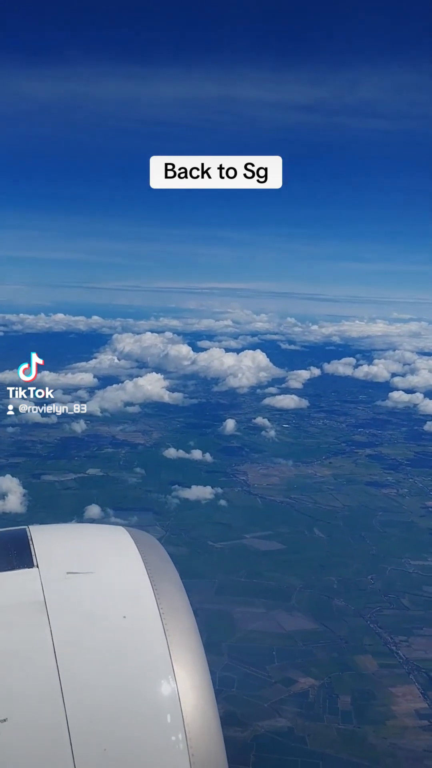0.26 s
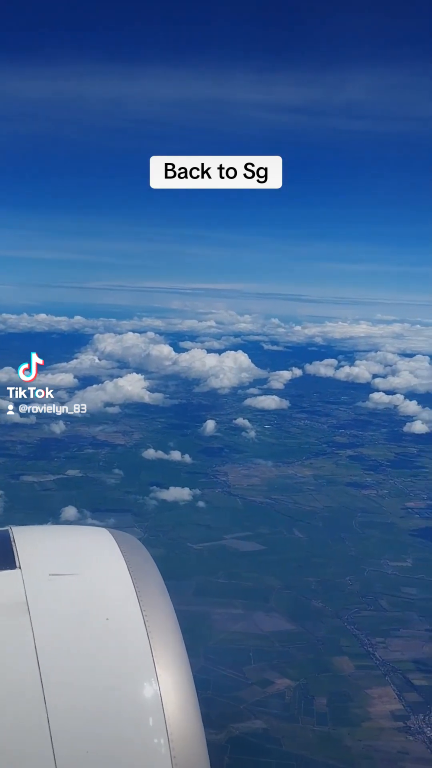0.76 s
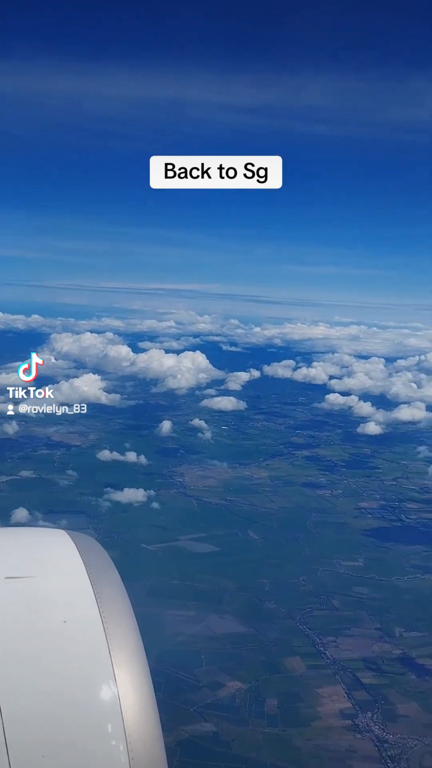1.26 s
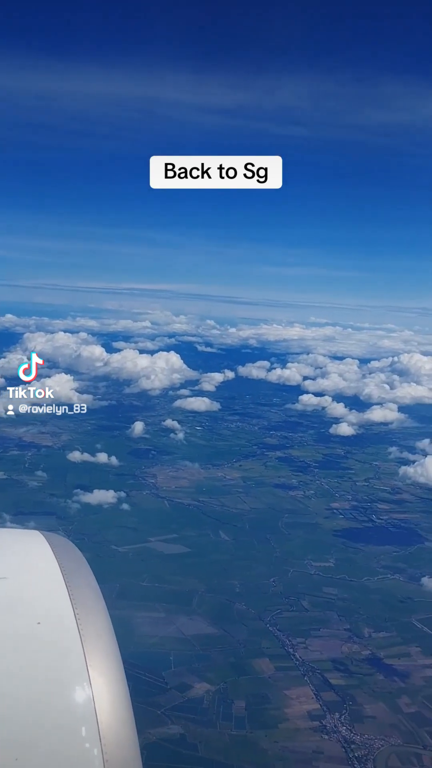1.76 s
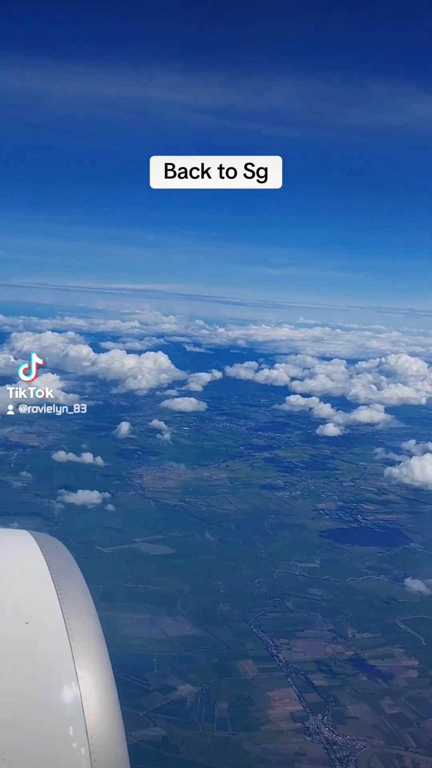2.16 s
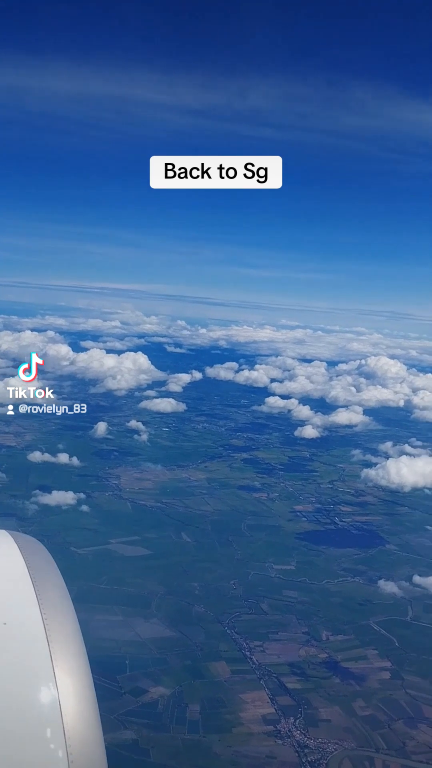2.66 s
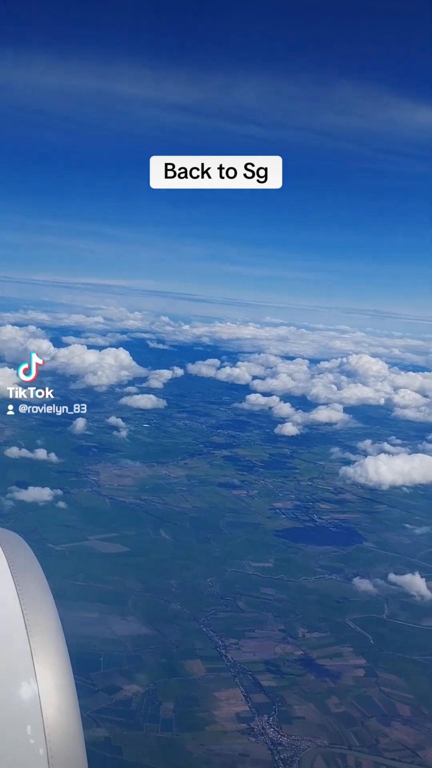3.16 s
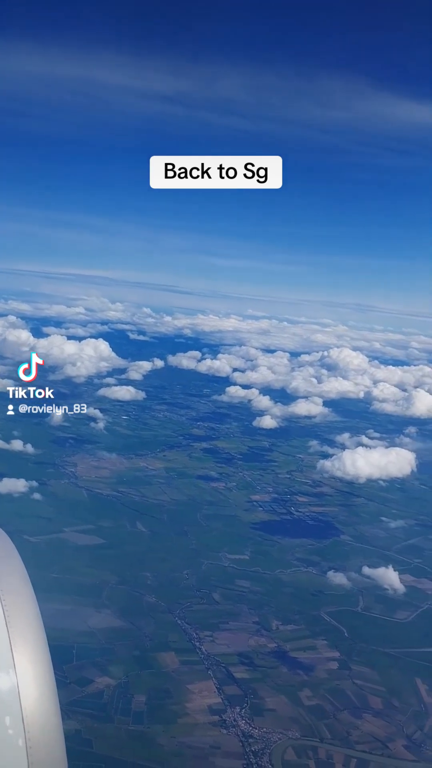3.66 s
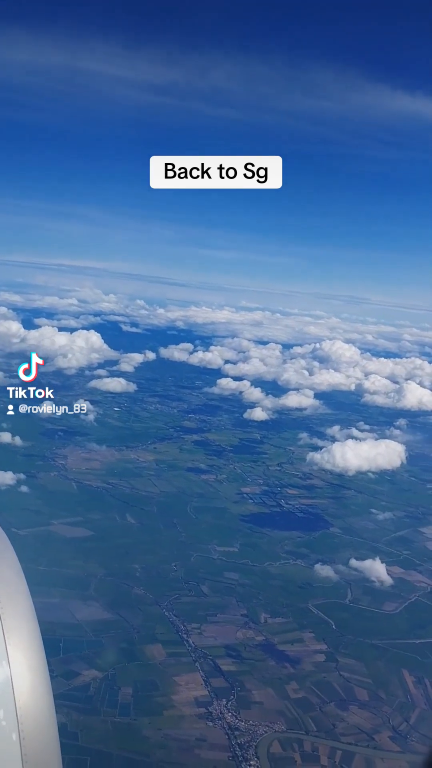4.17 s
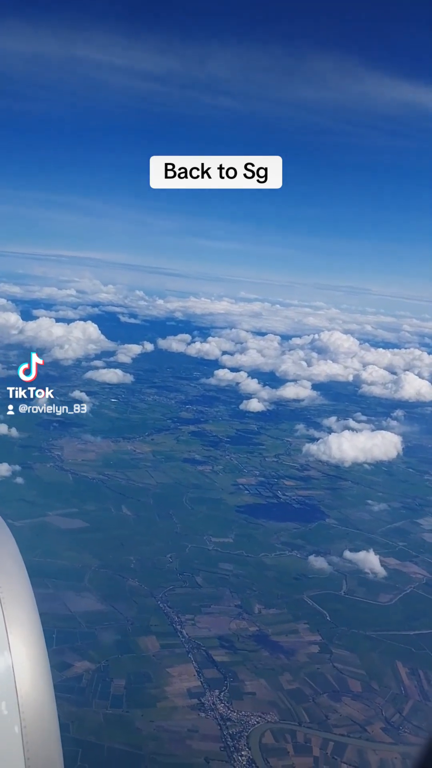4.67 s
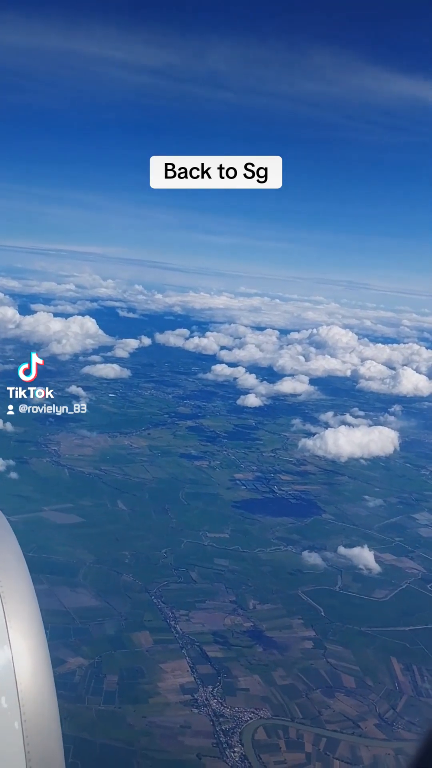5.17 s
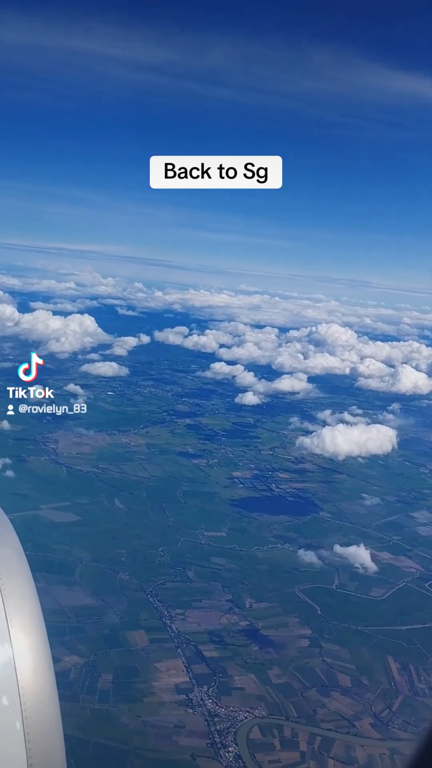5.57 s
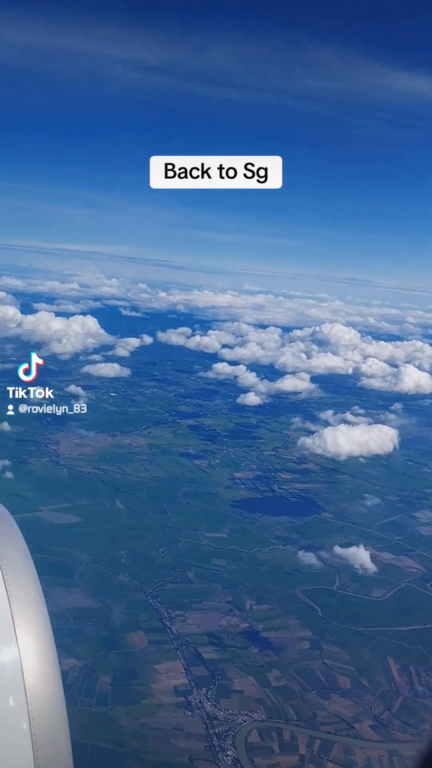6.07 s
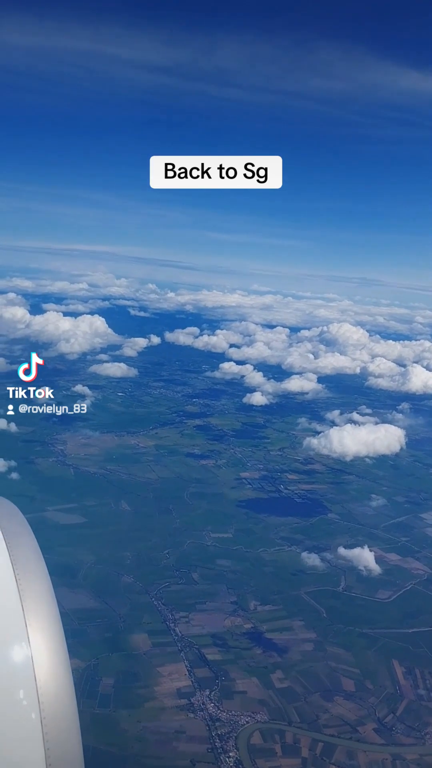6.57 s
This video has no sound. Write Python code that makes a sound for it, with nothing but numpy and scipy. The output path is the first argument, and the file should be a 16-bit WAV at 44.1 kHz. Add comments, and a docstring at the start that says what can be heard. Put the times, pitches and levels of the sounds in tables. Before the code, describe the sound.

Close cabin perspective beside a jet engine: dark, bass-heavy mono noise, gently fluttering, with a low pulsing hum, wavering shaft tones and a faint mid-pitched fan whine. It is almost constant, except for slow rumble shifts and very faint panel ticks in the second half. A sharp click cuts it off; after a tiny gap, stuttering clicks introduce rougher, airier stereo wind noise that rises to an abrupt end.

```python
"""Airliner cabin by the engine

A window seat in cruise: turbulent air on the skin is coloured noise, roaring through wall and cabin.
The fan shaft's throbbing drone, faster shafts and whining fans are wandering sines; slipping trim ticks as
struck modes. The mono bed breaks off with a click into a near-silent gap, then returns with more clicks
as a brighter, wider roar of stereo noise from another part of the flight, swelling to the end."""
import sys
import numpy as np
from scipy import signal
from scipy.fft import rfft, irfft
from scipy.io import wavfile

SR = 44100
rng = np.random.default_rng(int(sys.argv[2]) if len(sys.argv) > 2 else 0)


def transcribe(signal):
    """Save signal, clipped to [-1, 1], as a 16-bit WAV file at the path in sys.argv[1]."""
    frames = np.atleast_2d(signal).T
    limited = np.clip(frames, -1, 1)
    pcm = np.round(limited * 32767).astype(np.int16)
    wavfile.write(sys.argv[1], SR, pcm)


N = 300321
T = np.arange(N) / SR  # time/s
HZ = np.fft.rfftfreq(N, 1 / SR)

# airflow through the wall: f/Hz, relative density/dB per Hz
ROAR = [(15, -5), (50, -0.5), (120, -2), (330, -6), (480, -15), (620, -17.5), (850, -24.5), (1350, -32),
        (1900, -40.5), (2600, -47.0), (3700, -52.5), (4300, -57.5), (5800, -67), (7000, -87)]
ROAR_DB = -28.5
# resonances and hollows of the cabin: f/Hz, width/Hz, level/dB
CABIN_COLOUR = [(31.8, 5.5, -10.5), (71, 9, 4), (113, 18, -3), (191.5, 17, 2.5), (225, 20, 4),
                (254, 16, -2), (372, 66, 2), (510, 20, -0.5), (713, 31, 3.5), (1000, 65, 2.5),
                (1136, 110, -2.5), (2017, 50, -18.5), (2110, 62, 1.5), (3750, 280, 0), (4010, 260, -6)]
# slow level moves of the deep rumble: t/s, level/dB
RUMBLE_LEVEL = [(0, -3), (0.5, 0), (1.3, 1.5), (2, 0.5), (2.65, 2), (3.3, -0.5), (4.3, 0), (5.5, -3.5),
                (6.5, 2)]
RUMBLE_TOP_HZ = 95

# the fan shaft's deep drone, and the rate and depth (0-1) of its throb
DRONE_HZ, DRONE_BASE_DB = 46.65, -35
THROB_HZ, THROB_DEPTH = 6.5, .28
# level moves of the drone around its base: t/s, level/dB
DRONE_LEVEL = [(0, 0), (1.4, 1), (3.3, 0), (3.7, -7), (4.4, -4.5), (5.4, -4.5), (5.8, -1), (6.5, -3.5)]
# faster engine shafts and overtones: f/Hz, level/dB, unsteady share/0-1
SHAFTS = [(137, -44.5, .3), (263.5, -53, .7), (341.5, -46.5, .65), (420, -59, .5), (466, -56, .4)]
# cabin fans and pumps: f/Hz, level/dB, unsteady share/0-1
WHINES = [(542.8, -48.8, .15), (683, -62, .3), (851, -66, .4), (916, -67, .4), (931.7, -58, .15),
          (1863.4, -79, .5), (3730, -91, .8)]

# trim ticks: t/s, peak level before dulling/dB, pitch factor, lesser-mode level/dB, ring-time factor
TICKS = [(3.3485, -49, 0.87, -6, .55), (4.3235, -49.5, 1.02, 1, .6), (5.686, -53, 1.02, -22, .85)]
# main mode of the trim panel, before each tick's pitch and ring-time factors
PANEL_HZ, PANEL_T60_S = 2800, 0.018
# lesser modes, before the same factors: f/Hz, level against the main mode/dB, t60/s
LESSER_MODES = [(2000, -2, .012), (2450, -2, .012), (3450, -9, .012), (4480, -6.5, .014), (5000, -9, .012)]

# the gap, and the cabin remnant that dies away in it
DROPOUT_S, RETURN_S = 6.575, 6.693
REMNANT_DB, REMNANT_T60_S = -26, 0.038
# clicks at the break, the return and the stutters: t/s, step level/dB
CLICKS = [(6.575, -27), (6.693, -33.5), (6.7333, -33), (6.7933, -39)]

# the brighter roar: f/Hz, relative density/dB per Hz
LATE_ROAR = [(43, -3), (130, 1), (280, -1), (440, -2.5), (620, -12), (1050, -13.5), (1800, -26),
             (3000, -37), (5800, -50), (9000, -49), (12000, -62), (15500, -69)]
# resonances and hollows of the brighter roar: f/Hz, width/Hz, level/dB
LATE_COLOUR = [(140, 80, 1.5), (410, 62, 3.5), (594, 81, 0), (1780, 120, 2), (2150, 160, -2.5),
               (2290, 71, 5), (7300, 1000, 0), (8600, 600, 5)]
# likeness of its left and right sides: f/Hz, correlation/0-1
LATE_LIKENESS = [(100, 0.99), (300, 0.74), (520, 0.61), (900, 0.025), (8000, 0.036)]
# its base level, the offset it fades in from, the fade time and the steady growth
LATE_DB, LATE_FROM_DB, LATE_ATTACK_S, LATE_RISE_DB_PER_S = -27.5, -7.5, 0.019, 41
# surges of its bass: t/s, level/dB
LATE_BASS = [(6.693, -1), (6.705, -2), (6.718, 2), (6.738, -1.5), (6.756, 1), (6.783, -1.5), (6.802, 2.5)]
# surges of its midrange: t/s, level/dB
LATE_MIDS = [(6.693, -4), (6.712, -1), (6.731, 1), (6.737, -6.5), (6.748, -.5), (6.765, -2), (6.779, 3),
             (6.805, -1.5)]
# moves of its treble: t/s, level/dB
LATE_TREBLE = [(6.693, -2), (6.725, -5), (6.738, -7), (6.752, -3.5), (6.775, -1), (6.805, -.5)]
BASS_TOP_HZ, TREBLE_FROM_HZ = 800, 5000

BAND_LIMIT_HZ = 15700


def gain_of(db):
    """Decibels to an amplitude factor."""
    return 10 ** (np.asarray(db) / 20)


def level_over_time(points):
    """Gain curve through points of t/s, level/dB."""
    return gain_of(np.interp(T, *np.transpose(points)))


def evened(x):
    """Scales to rms 1."""
    return x / np.sqrt(np.mean(abs(x) ** 2) + 1e-20)


def read(points, hz):
    """Reads a spectrum on a log-frequency axis."""
    f, value = np.transpose(points)
    return np.interp(np.log(hz + 1), np.log(f + 1), value)


def humps(rows):
    """Resonances and hollows as a dB curve over frequency; each width spans half the hump's dB height."""
    return sum(db * np.exp(-np.log(16) * ((HZ - hz) / width) ** 2) for hz, width, db in rows)


def filtered(x, gain):
    """Shapes a sound by a gain at each frequency."""
    return irfft(rfft(x) * gain, N)


def noise(gain):
    """Random noise of rms 1 with the given gain at each frequency."""
    return evened(filtered(rng.standard_normal(N), gain))


def drift(rate_hz):
    """Slow random motion of rms 1, mostly below the given rate."""
    return noise(1 / (1 + (HZ / rate_hz) ** 4))


def tones(rows, fade_hz, wander_hz):
    """Rotating parts: wandering sines, each a steady share plus one that fades in and out at random."""
    out = np.zeros(N)
    for hz, db, unsteady in rows:
        fading = evened(drift(fade_hz) + 1j * drift(fade_hz))
        turns = np.cumsum(hz + wander_hz * drift(1.0)) / SR + rng.random()
        swing = np.sqrt(1 - unsteady) + np.sqrt(unsteady) * fading
        line = swing * np.exp(2j * np.pi * turns)
        out += gain_of(db) * evened(line.real)
    return out


def airflow(swell_db=0.02, flutter_db=0.24, boom_db=1.5, boom_hz=205, boom_width_hz=45):
    """Turbulence on the skin, coloured by wall and cabin; deep rumble swells, the cabin boom comes and goes."""
    roar = noise(gain_of(read(ROAR, HZ) + humps(CABIN_COLOUR)))
    rumble = filtered(roar, 1 / (1 + (HZ / RUMBLE_TOP_HZ) ** 8))
    boom = filtered(roar, np.exp(-((HZ - boom_hz) / boom_width_hz) ** 2))
    # add only the change in each band
    rumble_change = rumble * (level_over_time(RUMBLE_LEVEL) - 1)
    boom_change = boom * (gain_of(boom_db * drift(3.5)) - 1)
    roar = roar + rumble_change + boom_change
    # eddies press on the whole wall at once, so all bands waver together
    eddies_db = swell_db * drift(1.0) + flutter_db * drift(21)
    return gain_of(ROAR_DB + eddies_db) * roar


def drone(unsteady=0.02, fade_hz=6.3, throb_wander_hz=.5):
    """A slightly unbalanced fan shaft shakes the cabin: an uneven throb that sinks and partly recovers."""
    throb_turns = np.cumsum(THROB_HZ + throb_wander_hz * drift(2.8)) / SR
    throb = 1 + THROB_DEPTH * np.sin(2 * np.pi * throb_turns)
    hum = tones([(DRONE_HZ, DRONE_BASE_DB, unsteady)], fade_hz, wander_hz=0.12)
    return level_over_time(DRONE_LEVEL) * throb * hum


def shafts():
    """Faster engine shafts and their overtones sing as wavering lines."""
    return tones(SHAFTS, fade_hz=3.1, wander_hz=.2)


def fans():
    """Cabin fans and pumps whine as thin, wavering lines."""
    return tones(WHINES, fade_hz=4, wander_hz=0.3)


def trim(scrape=.15, scrape_t60_s=0.008, dull_hz=5200):
    """A plastic panel slips: a tiny scrape rings its modes, the lesser ones more when sharp; seats dull it."""
    t = np.arange(SR // 10) / SR
    out = np.zeros(N)
    for start_s, db, pitch, sharp_db, length in TICKS:
        modes = [(PANEL_HZ, 0, PANEL_T60_S)]
        modes += [(hz, mode_db + sharp_db, t60) for hz, mode_db, t60 in LESSER_MODES]
        ring = np.zeros(len(t))
        for hz, mode_db, t60 in modes:
            decay = gain_of(mode_db - 60 * t / (t60 * length))
            ring += decay * np.sin(2 * np.pi * hz * pitch * t)
        ring *= 1 - np.exp(-t / .0005)  # soft onset
        slip = scrape * rng.standard_normal(len(t)) * gain_of(-60 * t / scrape_t60_s)
        slip[0] += 1  # the sudden release
        tick = signal.fftconvolve(slip, ring)[:len(t)]
        out[round(start_s * SR):][:len(t)] += gain_of(db) * tick / abs(tick).max()
    return filtered(out, 1 / (1 + (HZ / dull_hz) ** 12))


def clicks(decay_s=.0003):
    """Each break in the sound is a sudden step that sinks straight back."""
    t = np.arange(SR // 100) / SR
    out = np.zeros(N)
    for start_s, db in CLICKS:
        part = out[round(start_s * SR):][:len(t)]
        part += gain_of(db) * np.exp(-t[:len(part)] / decay_s)
    return out


def late_airflow(buffet_db=0.1, buffet_hz=55):
    """Brighter noise grows in uneven surges, its treble dipping then opening; bass shared, treble diffuse."""
    left, other = rfft(rng.standard_normal((2, N)))
    same = read(LATE_LIKENESS, HZ)
    right = same * left + np.sqrt(1 - same ** 2) * other
    colour = gain_of(read(LATE_ROAR, HZ) + humps(LATE_COLOUR))
    roar = evened(irfft(np.array([left, right]) * colour, N))
    bass = filtered(roar, HZ <= BASS_TOP_HZ)
    mids = filtered(roar, (HZ > BASS_TOP_HZ) & (HZ < TREBLE_FROM_HZ))
    treble = filtered(roar, HZ >= TREBLE_FROM_HZ)
    for band, level in (bass, LATE_BASS), (mids, LATE_MIDS), (treble, LATE_TREBLE):
        roar = roar + band * (level_over_time(level) - 1)
    age = np.maximum(T - RETURN_S, 0)
    attack_db = LATE_FROM_DB * np.maximum(1 - age / LATE_ATTACK_S, 0)
    growth_db = LATE_RISE_DB_PER_S * age
    return roar * gain_of(LATE_DB + attack_db + growth_db + buffet_db * drift(buffet_hz))


def scene():
    """The mono cabin, a click and a near-silent gap, then the brighter stereo roar with its clicks."""
    cabin = airflow() + drone() + shafts() + fans() + trim()
    remnant = gain_of(REMNANT_DB - 60 * np.maximum(T - DROPOUT_S, 0) / REMNANT_T60_S)
    # 1 ms ramps on both sides of the gap
    before = np.clip((DROPOUT_S - T) / .001, 0, 1)
    after = np.clip((T - RETURN_S) / .001, 0, 1)
    return cabin * np.maximum(before, remnant) + late_airflow() * after + clicks()


def record(dry):
    """A 4 ms soft start, then a steep low-pass as the band limit."""
    fade_in = np.minimum(T / .004, 1)
    low_pass = signal.firwin(511, BAND_LIMIT_HZ, window=("kaiser", 9), fs=SR)
    return signal.oaconvolve(dry * fade_in, low_pass[None], "same")


dry = scene()
out = record(dry)
transcribe(out)
```